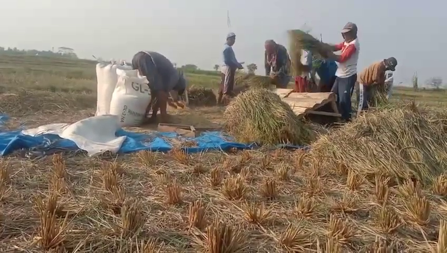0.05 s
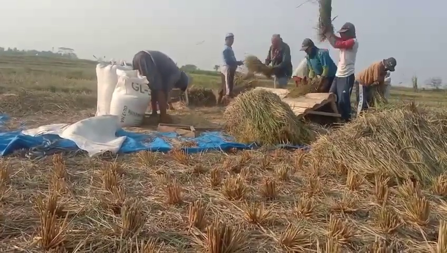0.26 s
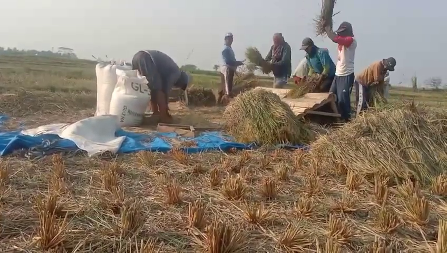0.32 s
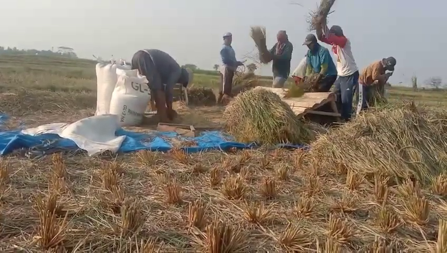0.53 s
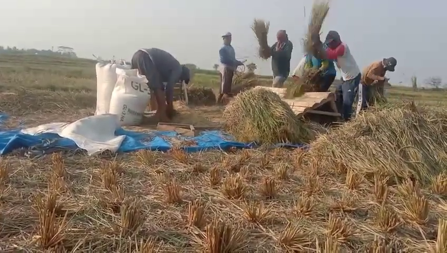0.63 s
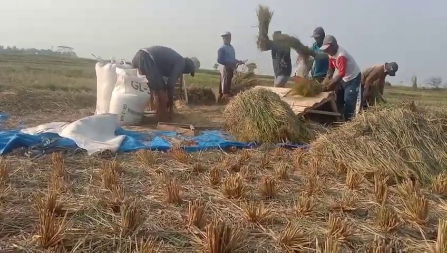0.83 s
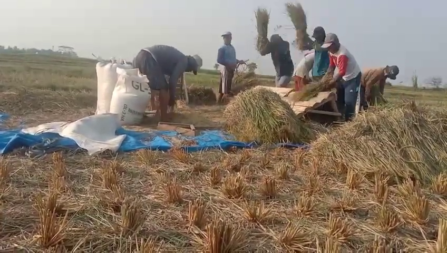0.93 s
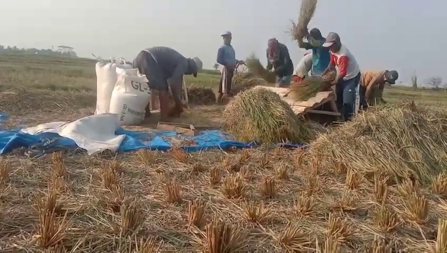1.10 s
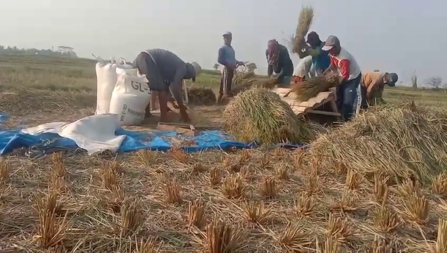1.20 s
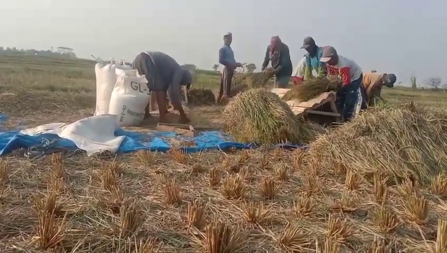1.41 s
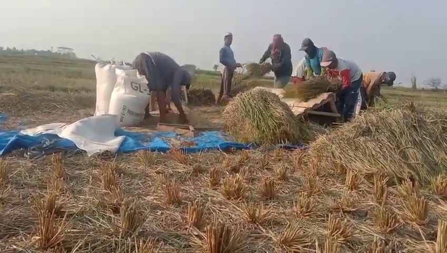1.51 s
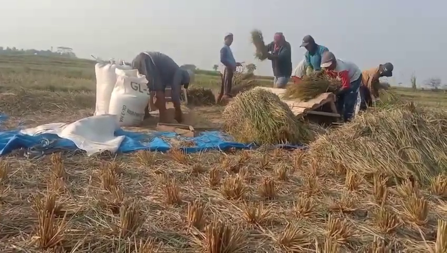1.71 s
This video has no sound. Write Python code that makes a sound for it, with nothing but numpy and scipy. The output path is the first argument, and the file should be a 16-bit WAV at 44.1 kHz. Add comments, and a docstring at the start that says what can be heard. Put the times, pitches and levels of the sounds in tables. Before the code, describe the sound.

Four sharp thwacks of straw bundles beaten on wooden slats in a quiet field.

```python
"""Straw rustles and a far bird chirps, then four blows land: workers are threshing rice in an open field.
They beat bundles of stalks on a slatted wooden stand. The leading stalks tick, the bundle lands as a
dense swarm of cracks, the stand booms, its loose slats knock, and loosened grain sprays down.
Around the blows, straw scrapes over wood, and bundles and feet land softly in the quiet air."""
import sys
import numpy as np
from scipy import signal
from scipy.io import wavfile

SR = 44100
rng = np.random.default_rng(int(sys.argv[2]) if len(sys.argv) > 2 else 0)


def put_to_file(sound):
    """Save the sound as 16-bit audio at rate SR, in the file named by the first command-line argument."""
    columns = np.atleast_2d(sound).T  # one column per channel
    safe = np.clip(columns, -1, 1)
    whole_steps = np.round(safe * 32767)
    wavfile.write(sys.argv[1], SR, whole_steps.astype(np.int16))


N = 77175
T = np.arange(N) / SR

# the tones the wooden slats ring with (pitch [Hz], level [dB], time to fade by 60 dB at damping 1 [s])
SLAT_MODES = [(471.4, -10, 0.2), (667, -3, 0.088), (796, -6.5, 0.047), (950, -3.5, 0.096), (1222, -16, 0.2),
              (1267, -1, 0.055), (1590, -11, .07), (1956, -13, .07), (2190, -9, .07)]
# tone colour of cracking stalks (frequency [Hz], level [dB])
CRACK_TONE = [(800, -26.5), (2000, -6.5), (2750, -15.5), (3400, -9), (3980, -2.5), (4400, -4), (5050, 2),
              (5550, -5.5), (6000, -9), (6900, -7.5), (8200, -24), (10500, -24.5), (12500, -16.5),
              (14200, -30), (16000, -13.5)]
# tone colour of loose straw and grain (frequency [Hz], level [dB])
STRAW_TONE = [(100, -24.5), (700, -16.5), (1000, -17), (1260, -6), (1550, -11), (2000, -3), (2600, -12),
              (3200, -8.5), (3900, -4), (4400, -4), (5000, 1), (5400, 2), (6100, -15), (7000, -9),
              (8200, -35.5), (10500, -24), (12700, -20), (14200, -31), (16000, -10)]
CRACKS_PER_S, CRACK_SPREAD_DB = 14000, 3


def blow(s, crack_db, slap_db, thump_db, slat_db, slat_hz, frame_db, frame_fall, spray_db,
         hold, rise, fall):
    """Stalks crack and slap on the slats, the stand thumps and shudders, and grain sprays off."""
    # tone colours of the bundle's slap, the stand's thump and its shudder (frequency [Hz], level [dB])
    slap_tone = [(40, -31), (120, 4), (250, -3), (450, -1.5), (620, 1.5), (800, -6), (950, 5.5),
                 (1080, -6.5), (1250, 3.5), (1450, -4.5), (1700, -1), (2100, 1), (2550, -15.5), (5000, -28),
                 (12000, -34.5)]
    thump_tone = [(25, -33), (55, -17), (85, -2.5), (130, 2.5), (185, -4), (280, -14), (600, -52),
                  (3000, -66)]
    shudder_tone = [(25, -29.5), (55, -23.5), (85, 2.5), (130, -4.5), (185, -1.5), (260, -13), (400, -17),
                    (700, -16), (1050, -18.5), (1255, -13), (1500, -19), (2100, -23), (2800, -29.5),
                    (8000, -83)]
    crack_shape = swell(s, rise, fall, hold) + amp(-19) * swell(s, rise, fall=0.023)
    crack = amp(crack_db) * burst(crack_shape, CRACK_TONE, CRACKS_PER_S, CRACK_SPREAD_DB)
    slap_shape = swell(s + 0.0016, rise, fall * 1.14, hold)
    slap = amp(slap_db) * burst(slap_shape, slap_tone, CRACKS_PER_S, spread_db=0)
    thump_shape = swell(s + 0.0037, rise=0.0049, fall=0.011)
    thump = amp(thump_db) * burst(thump_shape, thump_tone, CRACKS_PER_S, spread_db=-0.5)
    shudder_shape = swell(s + 0.015, rise=0.0053, fall=frame_fall)
    shudder = burst(shudder_shape, shudder_tone, per_s=1700, spread_db=0.5)
    frame = amp(frame_db) * (shudder + amp(2.5) * frame_boom(s))
    slats = amp(slat_db) * struck_slats(s, slat_hz)
    spray_shape = clumps() * swell(s + 0.005, rise=0.0068, fall=0.087)
    spray = amp(spray_db) * burst(spray_shape, STRAW_TONE, per_s=4600, spread_db=2.5)
    return crack + slap + thump + frame + slats + spray


def frame_boom(s):
    """The stand's frame rings with a few low tones."""
    # the frame's tones (pitch [Hz], level [dB], time to fade by 60 dB [s])
    frame_modes = [(86, -11, .22), (123.9, -3, 0.203), (183, -6.5, 0.15), (221, -17, 0.38)]
    return ring(s, frame_modes, rise=0.003)


def struck_slats(s, hz, fade_s=0.094, rise=0.00067):
    """The slat that is hit rings at its own pitch, and the others join in more softly."""
    struck = ring(s, [(hz, 0, fade_s)], rise)
    return struck + amp(-9) * ring(s, SLAT_MODES, rise)


def slat_knocks():
    """Loose slats drop back on the frame and ring briefly."""
    # knocks as stalks brush the slats or the stand rebounds (time [s], level [dB])
    knocks = [(0.231, -35.5), (.314, -35.5), (.322, -35), (.377, -47.5), (.594, -56), (.8935, -18.5),
              (.902, -24), (.909, -28.5), (.971, -33), (1.481, -51.5), (1.545, -29.5), (1.591, -33),
              (1.629, -44)]
    # tone colour of wood hitting wood (frequency [Hz], level [dB])
    knock_tone = [(100, -20), (400, -7.5), (900, -2), (1230, 7.5), (1550, -9), (2100, -7), (2600, -21.5),
                  (6000, -29), (14000, -50)]
    sound = np.zeros(N)
    for s, db in knocks:
        shape = swell(s + 0.00061, rise=0.00037, fall=0.003)
        hit = burst(shape, knock_tone, per_s=4700, spread_db=-1)
        ringing = amp(-5) * ring(s, SLAT_MODES, rise=0.00027, damping=1.8)
        sound += amp(db) * (hit + ringing)
    return sound


def stalk_snaps(treble_hz=9000):
    """Single dry stalks strike or break with a sharp tick."""
    # snapping stalks (time [s], level [dB], treble boost or cut [dB])
    snaps = [(0.2279, -18, -1), (0.229, -29, 1), (0.2365, -25, 12), (.241, -25, 3), (.846, -38, 5),
             (0.858, -33, 8), (1.048, -47, -12), (1.4803, -42, -8.5), (1.493, -45, -12)]
    sound = np.zeros(N)
    for s, db, treble_db in snaps:
        tone = [(hz, level + treble_db * (hz > treble_hz)) for hz, level in CRACK_TONE]
        shape = swell(s, rise=0.0001, fall=0.0028)
        sound += amp(db) * burst(shape, tone, CRACKS_PER_S, CRACK_SPREAD_DB)
    return sound


def handled_straw():
    """Straw rustles when swept or shaken, and makes a duller scrape when dragged over wood."""
    # movements of the straw (time [s], level [dB], rise [s], fall [s])
    rustles = [(.05, -59, 0.29, 0.11), (.235, -45.5, 0.037, 0.0051), (0.676, -49, 0.028, .04),
               (.862, -43.5, 0.016, 0.014), (1.092, -50.5, 0.16, 0.055), (1.494, -47, 0.013, 0.018)]
    scrapes = [(.185, -56.5, 0.034, 0.011), (.236, -46, 0.014, .012), (.69, -59.5, 0.019, .03),
               (.855, -52.5, 0.01, 0.0084), (1.13, -55.5, 0.034, 0.013), (1.21, -58.5, .012, 0.06),
               (1.345, -54.5, 0.03, 0.011), (1.41, -64.5, 0.037, 0.04)]
    # tone colour of straw on wood (frequency [Hz], level [dB])
    scrape_tone = [(200, -34), (700, -17.5), (1050, -10), (1255, -1), (1500, -9), (1980, -1.5),
                   (2500, -12.5), (4000, -18), (8000, -32.5)]
    return crackle(rustles, STRAW_TONE, steady_db=-64) + crackle(scrapes, scrape_tone, steady_db=-79.5)


def soft_landings(end_hz=74, sag_s=0.0076, plop_hz=545):
    """Bundles and feet land with a hollow plop and a low push that sags in pitch."""
    # landings (time [s], starting pitch [Hz], relative push level [dB], relative plop level [dB])
    landings = [(.197, 104, -47, -78), (.415, 88.5, -53, -77), (.669, 265, -42, -42.5)]
    sound = np.zeros(N)
    for s, start_hz, push_db, plop_db in landings:
        t = np.maximum(T - s, 0)
        hz = end_hz + (start_hz - end_hz) * np.exp(-t / sag_s)
        push = amp(push_db) * glide(hz * (t > 0)) * np.exp(-t / 0.015)
        plop = amp(plop_db) * np.sin(2 * np.pi * plop_hz * t) * np.exp(-t / 0.005)
        fade_in = 1 - np.exp(-t / 0.0027)
        sound += 2 * (push + plop) * fade_in
    return sound


def far_bird(waver_hz=45):
    """A far bird sings faint, falling notes that waver in pitch."""
    # bird notes (time [s], length [s], starting pitch [Hz], ending pitch [Hz], level [dB])
    notes = [(0.027, 0.11, 4720, 3910, -57.5), (0.063, 0.0061, 5450, 5260, -48.5),
             (0.1574, 0.0056, 4790, 4680, -45.5)]
    sound = np.zeros(N)
    for s, length, start_hz, end_hz, db in notes:
        progress = np.clip((T - s) / length, 0, 1)
        hz = start_hz + (end_hz - start_hz) * progress + waver_hz * wander(seconds=0.0053)
        arch = np.sqrt(4 * progress * (1 - progress))
        sound += amp(db) * arch * glide(hz)
    return sound


def field_air():
    """The open field gives a faint, steady rumble and hiss."""
    # tone colour of the air (frequency [Hz], level [dB])
    air_tone = [(25, 3), (55, -0.5), (90, 2), (180, -2.5), (300, -11), (700, -13), (1250, -16), (2000, -15),
                (3000, -25), (8000, -22), (16000, -53)]
    return amp(-67.5) * colour(rng.standard_normal(N), air_tone)


def burst(shape, tone, per_s, spread_db):
    """A swarm of impacts that follows a loudness shape and has the same energy as that shape."""
    swarm = colour(clicks(per_s, spread_db) * shape, tone)
    return unit(swarm) * np.sqrt(np.mean(shape ** 2))


def ring(s, modes, rise, damping=1, vary_db=2):
    """Fading tones of wood struck at time s; each strike mixes them a little differently."""
    t = np.maximum(T - s, 0)
    hz, db, fade_s = np.transpose(modes)[:, :, None]
    gain = amp(db + vary_db * rng.standard_normal(hz.shape))
    waves = np.sin(2 * np.pi * (hz * t + rng.random(hz.shape)))
    fade_out = np.exp(-np.log(1000) * t * damping / fade_s)
    fade_in = 1 - np.exp(-t / rise)
    return np.sqrt(2) * (gain * waves * fade_out).sum(0) / np.linalg.norm(gain) * fade_in


def crackle(moves, tone, steady_db):
    """Fine, clumped clicks of straw that swell with each movement."""
    move_power = sum((amp(db) * swell(s, rise, fall)) ** 2 for s, db, rise, fall in moves)
    level = np.sqrt(amp(steady_db) ** 2 + move_power)
    return colour(level * clumps() * clicks(per_s=4500, spread_db=1.5), tone)


def clicks(per_s, spread_db):
    """Tiny impacts at random times; spread_db sets how much their sizes differ."""
    size = amp(spread_db * np.minimum(rng.exponential(1, N), 4))
    return unit(size * rng.choice([-1, 1], N) * (rng.random(N) < per_s / SR))


def clumps(depth_db=2.9):
    """The uneven loudness of straw and grain arriving in clumps."""
    return unit(amp(depth_db * wander(seconds=0.024)))


def wander(seconds):
    """A random drift that changes over about this many seconds."""
    return unit(signal.lfilter([1], [1, -np.exp(-1 / (seconds * SR))], rng.standard_normal(N)))


def swell(s, rise, fall, hold=0):
    """A loudness shape that grows, holds around time s, then dies away."""
    before = (s - hold / 2 - T) / rise
    after = (T - s - hold / 2) / fall
    return np.exp(-np.maximum(np.maximum(before, after), 0))


def glide(hz):
    """A pure tone that follows a changing pitch."""
    return np.sin(2 * np.pi * np.cumsum(hz) / SR)


def colour(x, tone, size=8192):
    """Filters x to a tone colour: how strong its frequencies are compared with each other."""
    hz, db = np.transpose(tone)
    grid_hz = abs(np.fft.fftfreq(size, 1 / SR)) + 1
    log_gain = np.log(amp(np.interp(np.log(grid_hz), np.log(hz), db)))
    # this makes the filter ring only after a click, never before it
    spectrum = np.exp(np.conj(signal.hilbert(log_gain)))
    response = np.fft.ifft(spectrum).real[:size // 2]
    return signal.fftconvolve(x, response / np.linalg.norm(response))[:N]


def amp(db):
    """Turns decibels into a multiplier."""
    return 10 ** (np.asarray(db) / 20)


def unit(x):
    """Scales x to an average (rms) level of 1."""
    return x / np.sqrt(np.mean(x ** 2) + 1e-20)


def scene():
    """The threshers and the bird over the quiet air of the field, in one channel."""
    # bundles hitting the stand (time [s], crack [dB], slap [dB], thump [dB], slat [dB], slat pitch [Hz],
    # frame [dB], frame shudder fall [s], grain spray [dB], crack hold [s], crack rise [s], crack fall [s])
    blows = [(0.2538, -14, -16, -31.5, -22.5, 1233, -30.5, .042, -40, 0.0064, 0.00078, 0.0034),
             (0.875, -14.5, -21.5, -20.5, -26, 1710, -30.5, 0.05, -44, 0.0044, 0.0027, 0.0051),
             (1.278, -26.5, -27.5, -29.5, -34, 942, -51, 0.04, -50, 0.0092, 0.0038, 0.0073),
             (1.522, -24.5, -27, -34, -34.5, 741, -34, .045, -47, 0.0072, 0.0026, 0.0067)]
    air = field_air()
    beating = sum(blow(*row) for row in blows) + slat_knocks() + stalk_snaps()
    return (beating + handled_straw() + soft_landings() + far_bird() + air)[None]


def record(dry, low_cut_hz=44.4, high_cut_hz=15700):
    """A small microphone: its housing rings, and it loses the deepest bass and highest treble."""
    # narrow resonances of the housing (frequency [Hz], width [Hz], added level [dB])
    housing = [(1257, 39, 0), (1980, 43, -9), (3972, 64, -2), (4990, 48, -15.5), (5337, 83, -6),
               (5505, 46, 0)]
    wet = dry.copy()
    for hz, width, db in housing:
        wet += amp(db) * signal.lfilter(*signal.iirpeak(hz, hz / width, SR), dry)
    low_cut = signal.butter(2, low_cut_hz, "high", fs=SR, output="sos")
    high_cut = signal.firwin(255, high_cut_hz, window=("kaiser", 9), fs=SR)
    return signal.oaconvolve(signal.sosfilt(low_cut, wet), high_cut[None], "same")


dry = scene()
out = record(dry)
put_to_file(out)
```